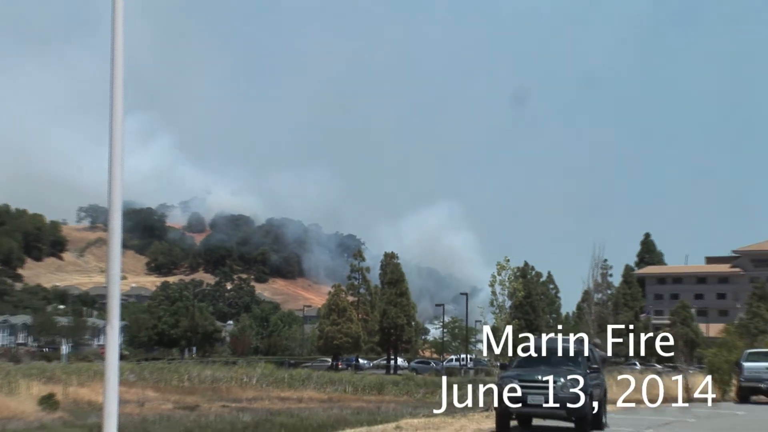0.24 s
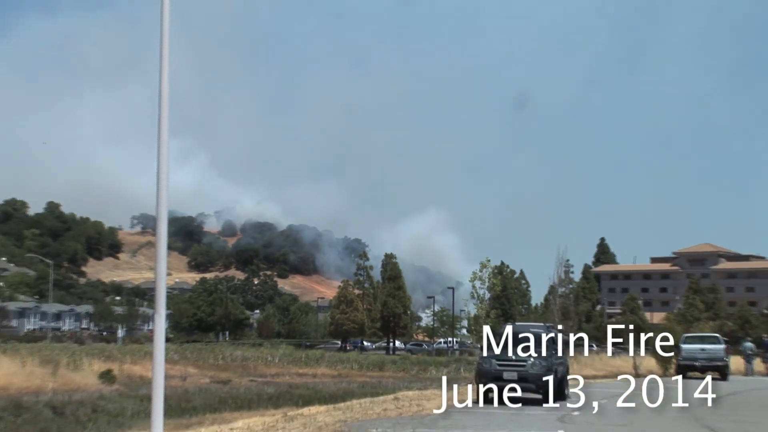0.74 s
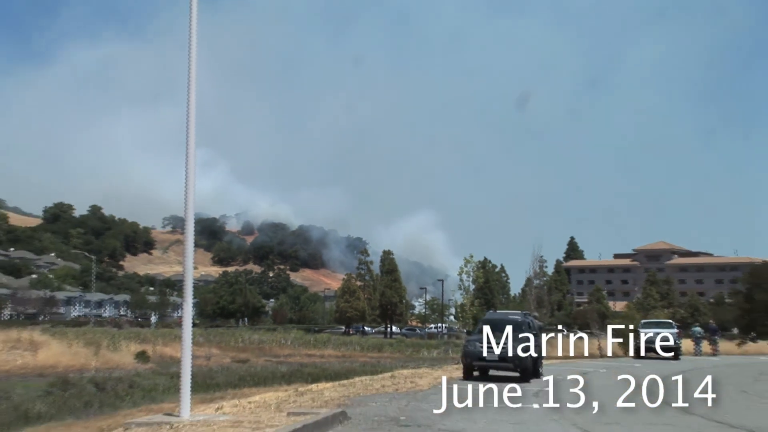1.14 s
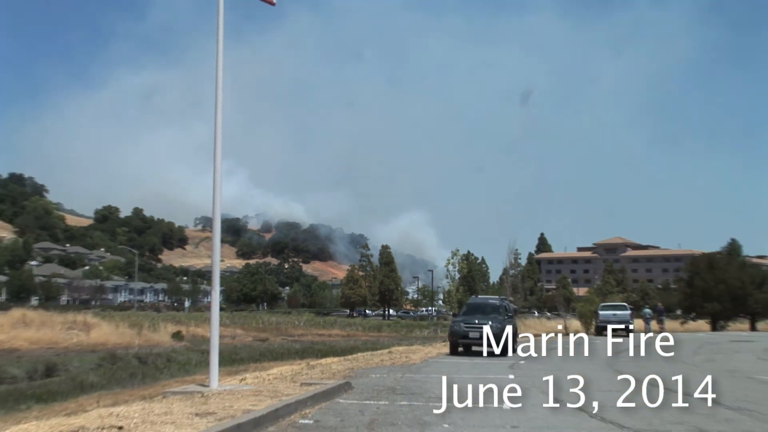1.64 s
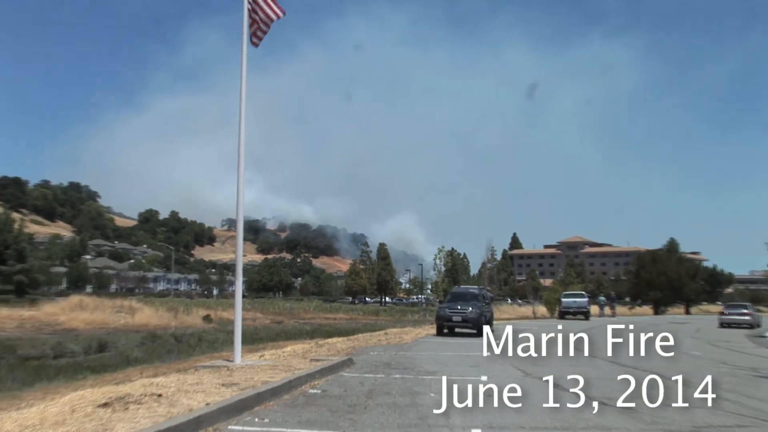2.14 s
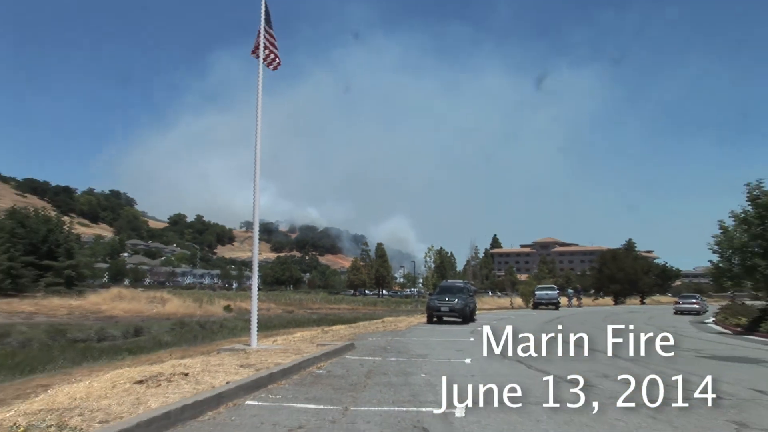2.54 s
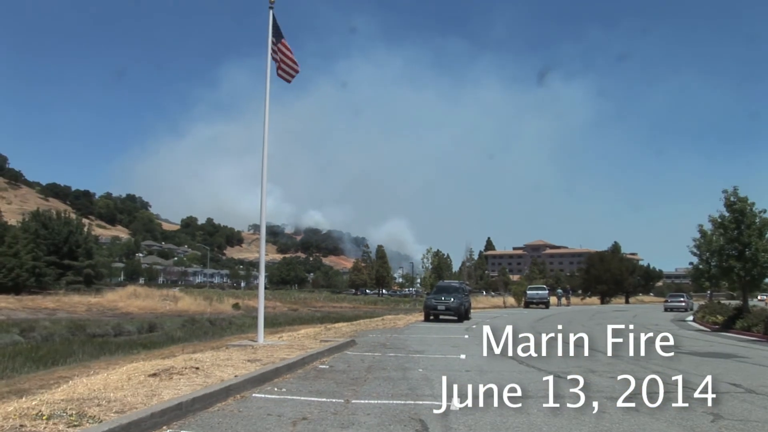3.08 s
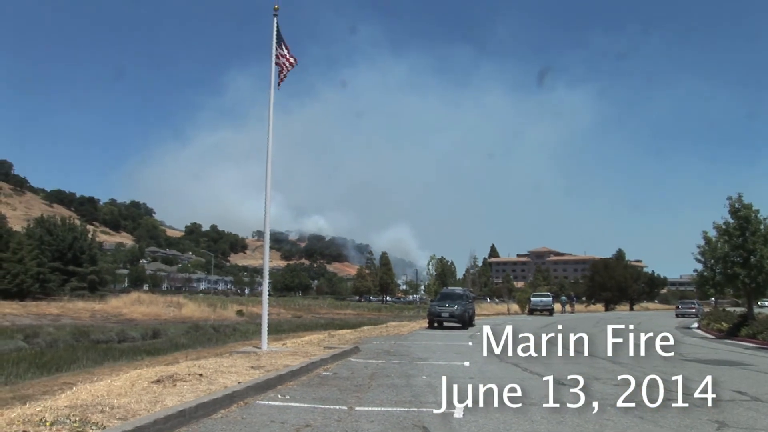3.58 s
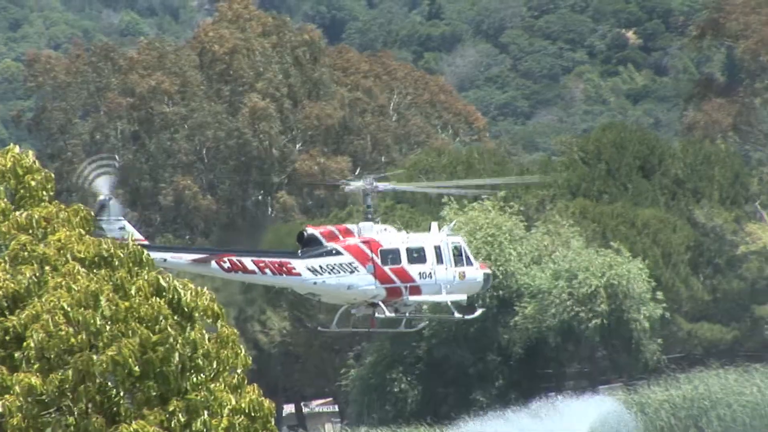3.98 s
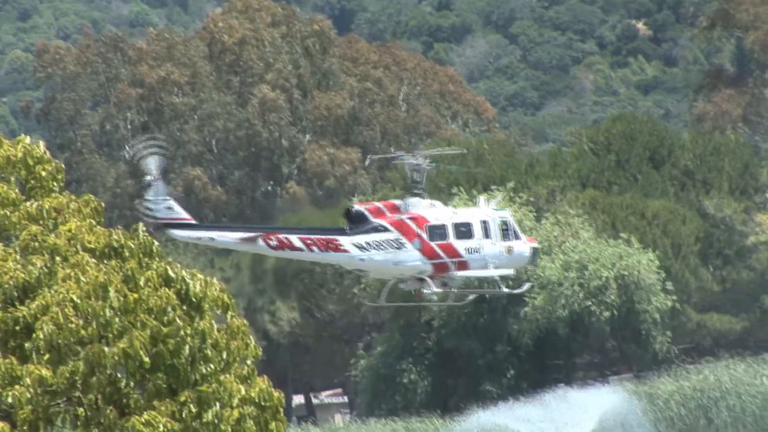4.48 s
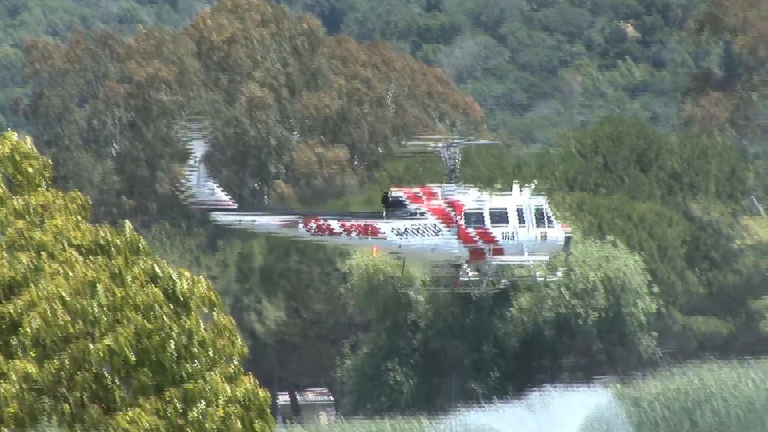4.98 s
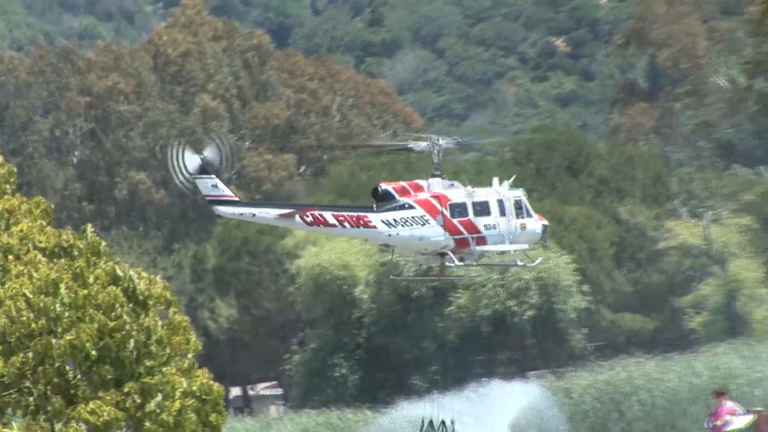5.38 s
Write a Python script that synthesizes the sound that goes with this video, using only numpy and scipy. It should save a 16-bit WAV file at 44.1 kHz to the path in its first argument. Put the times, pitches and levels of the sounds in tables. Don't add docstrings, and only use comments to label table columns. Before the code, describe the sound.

A small camera microphone catches a subdued roadside: deep traffic rumble, passing drones, an idling engine fading to a weaker hum, and scattered knocks and creaks from handling. A small click marks the hard cut, then a helicopter fills the sound, close and loud in open air, with rapid chopping, rattling tail pulses echoed by the ground, bright cracks and a pulsing turbine roar until the end.

```python
import sys
import numpy as np
from scipy import signal
from scipy.fft import rfft, irfft
from scipy.io import wavfile

SR = 44100
rng = np.random.default_rng(int(sys.argv[2]) if len(sys.argv) > 2 else 0)


def output_pcm(signal):
    pcm = np.clip(np.atleast_2d(signal).T, -1, 1) * 32767
    wavfile.write(sys.argv[1], SR, np.round(pcm).astype(np.int16))


def boost_factor(decibels):
    exponent = np.asarray(decibels, float) / 20
    return 10 ** exponent


N = 247842
T = np.arange(N) / SR
CUT_S, STEP_S = 3.846, 3.8507
MAIN_HZ, MAIN_AT_S = 10.41, 4.5436
TAIL_HZ, TAIL_AT_S = 53.38, 4.6112

# pitch_hz, level_db (per Hz)
ROAR_COLOUR = [(24, -34), (40, -1.5), (161, 3), (239, -1.5), (335, -9), (392, -23), (740, -15.5),
               (997, -24), (1220, -15.5), (1700, -28), (1880, -18.5), (2160, -17), (3770, -29),
               (4250, -32.5), (4600, -48.5), (5980, -77.5), (10100, -120)]
# pitch_hz, level_db (per Hz)
HISS_COLOUR = [(5500, -6), (8000, -2.5), (11000, -1), (14000, -1), (14500, -8), (15100, -10)]


def rms_one(x):
    return x / np.sqrt(np.mean(x ** 2) + 1e-20)


def in_time(rows):
    s, *columns = np.transpose(rows)
    return [np.interp(T, s, c) for c in columns]


def band(x, lo_hz, hi_hz):
    return signal.sosfilt(signal.butter(2, [lo_hz, hi_hz], "band", fs=SR, output="sos"), x)


def steep_band(x, lo_hz, hi_hz):
    return band(band(x, lo_hz, hi_hz), lo_hz, hi_hz)


def drift(rate):
    r = np.exp(-80 * np.pi * rate / SR)
    slow = signal.lfilter([1], [1, -2 * r, r * r], rng.standard_normal(N // 40 + 2002))[2000:]
    return np.interp(np.arange(N) / 40, np.arange(len(slow)), rms_one(slow))


def noise(spectrum, lo_hz, hi_hz, patchy_db):
    hz = np.arange(1, N // 2 + 2) * SR / N
    points = np.array(spectrum)
    colour_db = np.interp(np.log(hz), np.log(points[:, 0]), points[:, 1])
    shaped = rfft(rng.standard_normal(N)) * boost_factor(colour_db)
    edges = np.geomspace(lo_hz, hi_hz, 5)
    together = drift(7.9)
    total = np.zeros(N)
    for low, high in zip(edges, edges[1:]):
        one_slice = irfft(shaped * (hz >= low) * (hz < high), N)
        total += one_slice * boost_factor(patchy_db * (0.57 * together + drift(15)))
    return rms_one(total)


def strike(at_s, level_db, modes, spread_db):
    out = np.zeros(N)
    luck = rng.standard_normal((len(at_s), len(modes)))
    for (hz, db, t60), own in zip(modes, luck.T):
        clicks = np.full(N, 1e-18)
        clicks[(at_s * SR).astype(int)] = boost_factor(level_db + db + spread_db * own)
        r = boost_factor(-60 / (t60 * SR))
        w = 2 * np.pi * hz / SR
        out += signal.lfilter([0, np.sin(w)], [1, -2 * r * np.cos(w), r * r], clicks)
    return out


def puffs(at_s, level_db, t60):
    gate = np.full(N, 1e-18)
    gate[(at_s * SR).astype(int)] = boost_factor(level_db)
    return signal.lfilter([1], [1, -boost_factor(-60 / (t60 * SR))], gate) * rng.standard_normal(N)


def passes(hz, at_s, width_ms):
    since = ((T - at_s) * hz + .5) % 1 - .5
    return np.exp(-.5 * (since / hz / (width_ms / 1000)) ** 2)


def traffic():
    # time_s, rumble_db
    vigour = [
        (0.0, -36.5),
        (0.25, -37),
        (0.75, -35),
        (1.45, -36.5),
        (1.96, -37),
        (2.8, -39),
        (3.2, -38),
        (3.83, -35.5),
    ]
    # pitch_hz, level_db (per Hz)
    road_colour = [(20, -0.5), (45, 0.5), (100, -1), (156, -2), (201, -9.5), (279, -7), (523, -23.5),
                   (834, -26), (1100, -22), (2170, -31), (3080, -41), (3900, -52), (5000, -54.5),
                   (7000, -68.5)]
    # middle_s,
    # length_s, pitch_hz, width_hz, level_db
    drones = [
        (1.01, 0.2, 568, 140, -52.5),
        (2.66, 0.16, 256.7, 11, -47.5),
        (0.83, 0.22, 223, 11, -46),
    ]
    rumble_db, = in_time(vigour)
    tyre_db = -47.5 + 0.54 * (rumble_db - rumble_db.mean())
    out = boost_factor(rumble_db - 1.5) * noise(road_colour, 22, 400, patchy_db=1.0)
    out += boost_factor(tyre_db - 1.03) * noise(road_colour, 400, 7000, patchy_db=0.67)
    for s, length, hz, width, db in drones:
        drone = rms_one(band(rng.standard_normal(N), hz - width / 2, hz + width / 2))
        out += boost_factor(db) * np.exp(-((T - s) / length) ** 4) * drone
    return out


def engine_hum():
    # time_s, pitch_hz, level_db
    second_tone = [(0.0, 147.4, -33.5), (0.12, 150.6, -32.5), (0.91, 150.5, -43), (1.1, 151.5, -39.5),
                   (1.3, 152.4, -37.5), (1.34, 155, -48.5), (1.81, 151.8, -42.5), (1.86, 151, -36.5),
                   (2.12, 151.6, -40.5), (2.16, 157.5, -47.5), (2.3, 159, -48), (2.86, 158.5, -47),
                   (3.05, 150.5, -42.5), (3.83, 151.4, -39.5)]
    hz, second_db = in_time(second_tone)
    load_comes_off_db = 9 * (T > 1.2)
    first_db = -39 - load_comes_off_db + 1.5 * drift(2.7)
    third_db = -54.5 + 1.5 * drift(2.5)
    turn = np.pi * np.cumsum(hz + .6 * drift(6)) / SR
    out = np.zeros(N)
    for order, db in enumerate([first_db, second_db, third_db], 1):
        out += np.sqrt(2) * boost_factor(db + 1.6 * drift(27)) * np.sin(order * turn)
    return out


def ticks():
    # time_s, knock_db, snap_db, snap_pitch_hz, t60_s
    knocks = [
        (0.4126, -44, -61, 3600, 0.046),
        (0.5903, -56, -60, 9000, .065),
        (1.3294, -51, -74, 4200, 0.054),
        (1.8004, -42, -52, 5400, 0.023),
        (2.965, -57, -65, 11900, .078),
        (3.1917, -57, -53, 9500, .09),
        (3.2929, -53, -64, 3600, .16),
        (3.458, -46, -55.5, 4800, 0.036),
        (3.7568, -55, -75, 4600, .05),
        (3.7918, -40, -68, 4600, 0.076),
    ]
    # low_hz, high_hz
    body_bands = [
        (1800, 3200),
        (3300, 3900),
        (4400, 5300),
        (5600, 6150),
        (9000, 14500),
    ]
    s, knock_db, snap_db, snap_hz, t60s = np.transpose(knocks)
    fades = np.array([(T >= a) * boost_factor(-60 * np.abs(T - a) / t60) for a, t60 in zip(s, t60s)])
    white = rng.standard_normal(N)
    out = np.zeros(N)
    for lo_hz, hi_hz in body_bands:
        octaves_away = np.abs(np.log2(np.sqrt(lo_hz * hi_hz) / snap_hz))
        db = snap_db - 10 * octaves_away
        if lo_hz == body_bands[0][0]:
            db = knock_db
        out += (boost_factor(db - 7) @ fades) * rms_one(steep_band(white, lo_hz, hi_hz))
    return out


def brake_squeal():
    # time_s, pitch_hz, level_db
    squeal = [
        (1.9, 2950, -95),
        (2.0, 3050, -76),
        (2.15, 3115, -75),
        (2.72, 3118, -75),
        (2.85, 3110, -95),
    ]
    hz, db = in_time(squeal)
    flutter = 1 + 1.2 * np.cos(2 * np.pi * 55 * T)
    turn = 2 * np.pi * np.cumsum(hz + 12 * drift(20)) / SR
    return boost_factor(db + 2 * drift(12)) * flutter * np.sin(turn)


def creaks():
    # start_s, length_s, slips_per_s at the start, slips_per_s at the end, level_db
    grip_creaks = [
        (2.535, .09, 235, 275, -49),
        (2.972, .062, 228, 288, -42),
        (3.355, .04, 250, 260, -51),
    ]
    out = np.zeros(N)
    for start, length, first, last, db in grip_creaks:
        slips = start + np.cumsum(1 / np.linspace(first, last, int(length * last)))
        part = np.clip((slips - start) / length, .05, .95)
        swell_db = db + 5 * np.log(np.sin(np.pi * part))
        rub = strike(slips, swell_db, [(2080, 3, .007), (2880, -2, .006)], spread_db=1.2)
        out += boost_factor(1.5) * steep_band(rub, 1700, 3200)
    return out


def main_rotor():
    thump = boost_factor(-14 + .6 * drift(8)) * passes(MAIN_HZ, MAIN_AT_S, 1.4)
    return thump + boost_factor(-21) * passes(MAIN_HZ, MAIN_AT_S, 3.6)


def tail_rotor(load_db, wake):
    bite = boost_factor(-16.5 + 0.4 * load_db - 3 + 6.0 * wake + 1.8 * drift(25))
    echo_ms = 5.37 + 0.17 * drift(2.2)
    arrival = TAIL_AT_S + .0005 * drift(12)
    pulses = passes(TAIL_HZ, arrival, 0.97) + 1.06 * passes(TAIL_HZ, arrival + echo_ms / 1000, 0.9)
    return -signal.lfilter(*signal.butter(1, 80, "high", fs=SR), bite * pulses)


def blows():
    # time_s, peak_db, answer_after_ms, answer_db
    blade_slaps = [(3.86, -20.5, 36.5, -21), (3.954, -17, 35, -31), (4.05, -23, 41, -17),
                   (4.145, -27, 75, -15.5), (4.238, -13.5, 17, -13.5), (4.331, -30, 33.6, -12),
                   (4.427, -17.5, 16, -8.5), (4.519, -4.5, 18, -13), (4.614, 0.5, 16.8, -7),
                   (4.707, -3, 37, -8.5), (4.8, -2, 18.7, -3.5), (4.895, -2.5, 32, -10),
                   (4.988, -4.5, 50, -8), (5.084, -10.5, 15, -15), (5.177, -6.5, 46, -12.5),
                   (5.27, -7.5, 73, -10), (5.365, -9.5, 58, -12), (5.457, -8, 66, -12.5),
                   (5.551, -11, 41, -17)]
    patter_ms = [17, 34, 52, 69]
    rows = []
    for s, db, answer_ms, answer_db in blade_slaps:
        rows += [(s, db), (s + answer_ms / 1000, answer_db)]
        for ms in patter_ms:
            if abs(ms - answer_ms) > 9:
                rows.append((s + ms / 1000, answer_db - 6.0))
    return [row for row in rows if row[0] < N / SR - .01]


def slaps():
    # pitch_hz, level_db, t60_s
    slap_rings = [(191, -3.5, 0.069), (255, 4.5, 0.023), (628, -6.5, 0.031), (756, 5.5, 0.013),
                  (1056, 5.5, 0.0085), (1220, -12.5, 0.0041)]
    s, db = np.transpose(blows())
    out = -strike(s + .0015, db - 11.5, slap_rings, spread_db=1.5)
    peaks = np.zeros(N)
    peaks[((s + .002) * SR).astype(int)] = boost_factor(db - 12)
    tip = np.exp(-.5 * (np.arange(-90, 91) / SR * 1000 / 0.17) ** 2)
    spikes = signal.fftconvolve(peaks, tip, "same")
    out -= boost_factor(3.0) * np.roll(spikes, -9)
    swell = signal.fftconvolve(peaks, np.exp(-np.abs(np.arange(-900, 901)) / SR / .003), "same")
    return out + swell * noise(ROAR_COLOUR, 450, 1600, patchy_db=2.5)


def cracks():
    # time_s, peak_db, pitch_hz
    snaps = [(3.9574, -19, 2200), (4.0679, -19, 2180), (4.1268, -29, 1980), (4.2378, -21, 2180),
             (4.255, -13, 2030), (4.3307, -19, 2130), (4.3688, -23, 2090), (4.5174, -12.5, 2800),
             (4.702, -24, 2200), (4.7205, -11, 2180), (4.8154, -9, 1900), (4.853, -11, 1770),
             (4.8715, -17, 2225), (4.889, -13, 2230), (4.9899, -14, 2220), (5.0068, -19, 2220),
             (5.0861, -7.5, 2260), (5.1759, -20, 2550), (5.1964, -22, 2160), (5.271, -14.5, 1900),
             (5.3018, -10.5, 1930), (5.3668, -15.5, 2800), (5.4481, -16.5, 2130), (5.4883, -12.5, 2280)]
    s, db, hz = np.transpose(snaps)
    out = np.zeros(N)
    for lo_hz, hi_hz in [(1700, 2800), (2300, 3120), (3000, 4100)]:
        centre_hz = np.sqrt(lo_hz * hi_hz)
        level_db = db - 24 * np.abs(np.log2(hz / centre_hz))
        out += steep_band(puffs(s, level_db + 9, .022), lo_hz, hi_hz)
        out -= strike(s + .0005, level_db - 5, [(centre_hz, 0, .011)], spread_db=1)
    return out


def crackle(high_db, throb_db):
    grain_db = 2.7 * np.minimum(rng.exponential(1, N), 4.0)
    grains = (rng.random(N) < 900 / SR) * boost_factor(grain_db) * rng.choice([-1, 1], N)
    return boost_factor(high_db - 9.0 + 1.05 * throb_db) * rms_one(band(grains, 1400, 3400))


def rushing_air(low_db, load_db, high_db, wake, throb_db):
    # pitch_hz, level_db (per Hz)
    turbine_colour = [(4700, -14.5), (5050, 0.5), (5600, -9.5), (6300, -14.5), (7000, -23), (7400, -22),
                      (7750, -28), (8500, -19), (9250, -28.5), (9700, -22), (10700, -32), (13000, -40)]
    body_db = -32.5 + 0.95 * load_db
    early_mid_db = 4.5 * np.exp(-((T - CUT_S) / 0.41) ** 4)
    mid_db = -34 + 0.84 * load_db + early_mid_db
    roar = boost_factor(low_db - 4.5 + 4.0 * wake) * noise(ROAR_COLOUR, 72, 400, patchy_db=.8)
    roar += boost_factor(body_db - 4.5 + throb_db) * noise(ROAR_COLOUR, 400, 950, patchy_db=2.5)
    roar += boost_factor(mid_db - 5.0 + throb_db) * noise(ROAR_COLOUR, 950, 1700, patchy_db=2.0)
    roar += boost_factor(high_db - 1.5 + 0.77 * throb_db) * noise(ROAR_COLOUR, 1700, 4700, patchy_db=1.03)
    return roar + boost_factor(-58 + .25 * throb_db) * noise(turbine_colour, 4700, 13000, patchy_db=.35)


def specks():
    # time_s, level_db
    tiny_ticks = [
        (3.927, -72),
        (4.456, -61),
        (4.6084, -62.5),
        (4.7097, -68),
        (4.7282, -66),
        (5.1098, -57.5),
    ]
    s, db = np.transpose(tiny_ticks)
    return steep_band(puffs(s, db + 5, .02), 12000, 15000)


def helicopter():
    # time_s, downwash_db (low roar), blade_load_db (about its mean)
    hover = [
        (3.86, -28.5, -3.0),
        (4.02, -20, -2),
        (4.31, -20, -1.5),
        (4.5, -23, -0.5),
        (4.67, -22.5, 5.0),
        (4.9, -23.5, 5.5),
        (5.1, -18.5, 4),
        (5.36, -18, -0.5),
        (5.62, -18.5, -3.0),
    ]
    low_db, load_db = in_time(hover)
    high_db = -33 + 0.29 * load_db
    wake = passes(TAIL_HZ / 5, 4.63, 16.5)
    throb_db = 3.97 * passes(TAIL_HZ, TAIL_AT_S + 0.0016, 5.6) + 2.2 * wake
    close = main_rotor() + tail_rotor(load_db, wake) + slaps() + cracks() + crackle(high_db, throb_db)
    close = .9 * np.tanh(close / .9)
    close = signal.sosfilt(signal.butter(8, 4100, fs=SR, output="sos"), close)
    return close + rushing_air(low_db, load_db, high_db, wake, throb_db) + specks()


def scene():
    roadside = traffic() + engine_hum() + ticks() + brake_squeal() + creaks()
    after = np.clip((T - CUT_S) / .009, 0, 1)
    step = -boost_factor(-20) * (T >= STEP_S) * np.exp(-np.abs(T - STEP_S) / .0012)
    return (roadside * (T < STEP_S) + after * helicopter() + step)[None]


def microphone_hiss():
    hiss = boost_factor(-80.5) * noise(HISS_COLOUR, 6000, 14300, patchy_db=.25)
    top = noise(HISS_COLOUR[:4], 14300, 15200, patchy_db=.25)
    return hiss + boost_factor(-91) * (drift(8) > 0) * (T < STEP_S) * top


def transport_whine():
    # multiple, level_db
    overtones = [(6, -78), (7, -77), (8, -76), (9, -86), (10, -83), (11, -81), (12, -90), (13, -89),
                 (14, -83), (15, -92), (16, -83), (18, -87), (19, -92), (20, -91)]
    out = np.zeros(N)
    for k, db in overtones:
        out += np.sqrt(2) * boost_factor(db) * np.sin(2 * np.pi * 299.7 * k * T + k * k)
    return out


def band_limit(x):
    return signal.sosfilt(signal.butter(12, 15140, fs=SR, output="sos"), x)


def record(dry):
    heard = signal.sosfilt(signal.butter(2, 30, "high", fs=SR, output="sos"), dry)
    heard = heard + microphone_hiss() + transport_whine()
    return band_limit(heard)


dry = scene()
out = record(dry)
output_pcm(out)
```